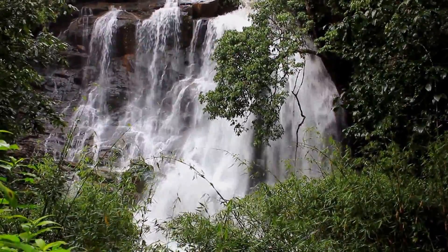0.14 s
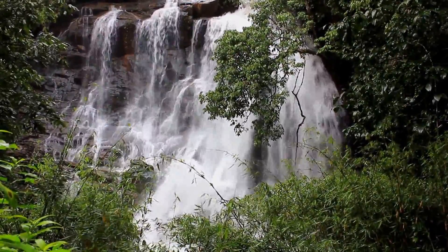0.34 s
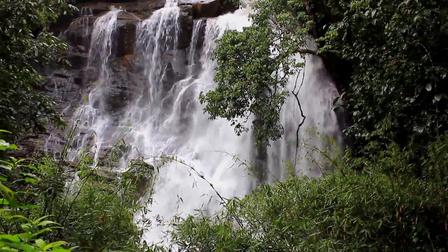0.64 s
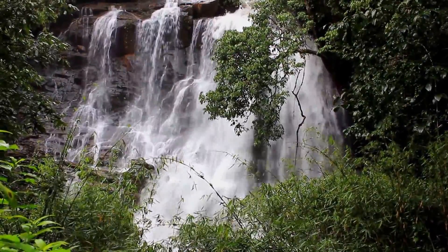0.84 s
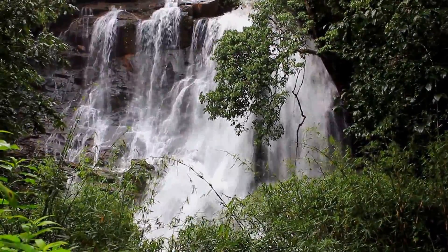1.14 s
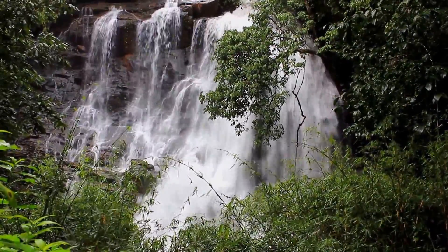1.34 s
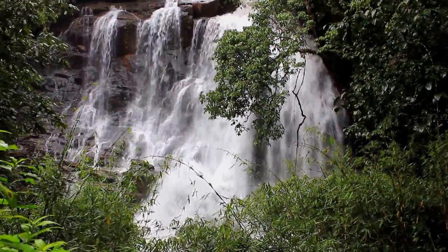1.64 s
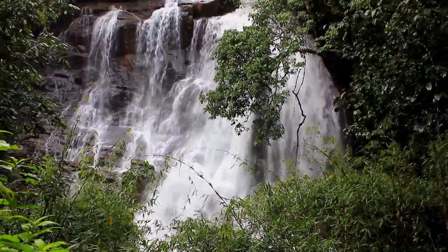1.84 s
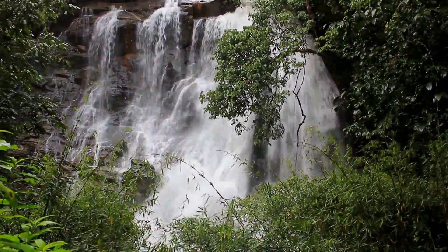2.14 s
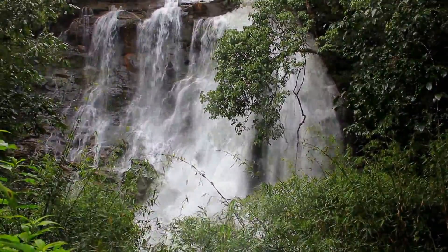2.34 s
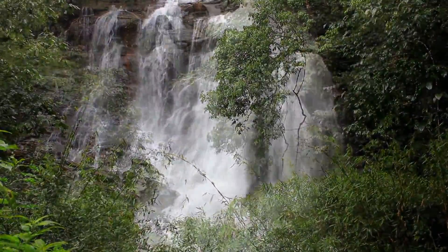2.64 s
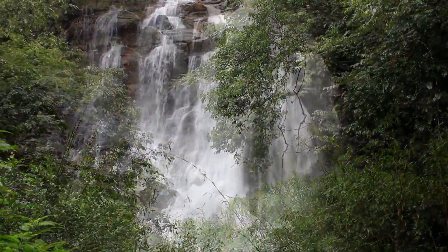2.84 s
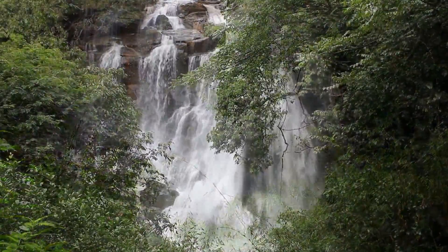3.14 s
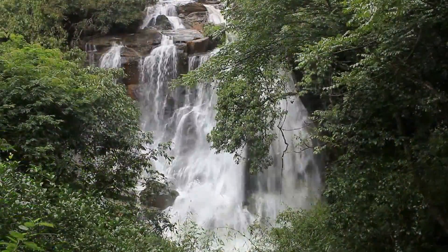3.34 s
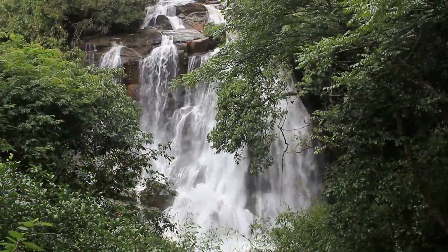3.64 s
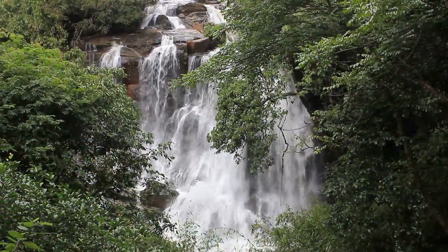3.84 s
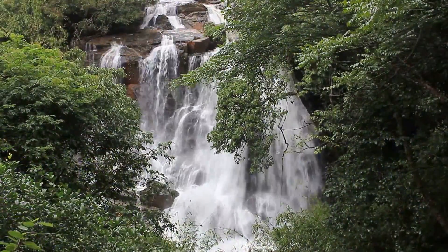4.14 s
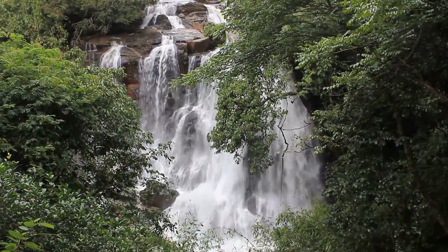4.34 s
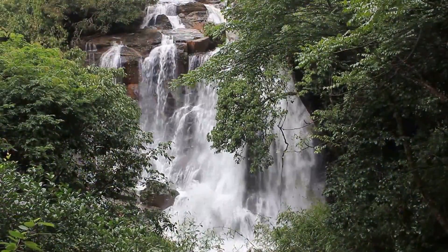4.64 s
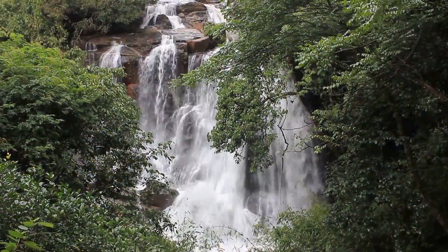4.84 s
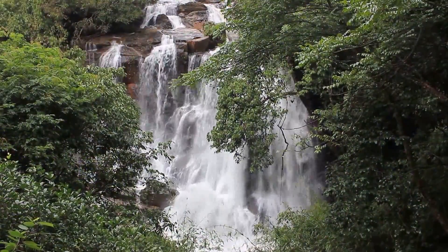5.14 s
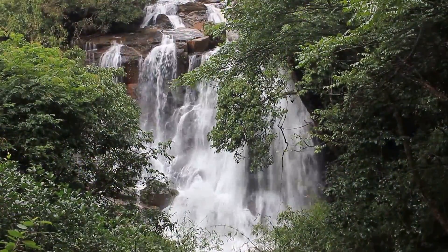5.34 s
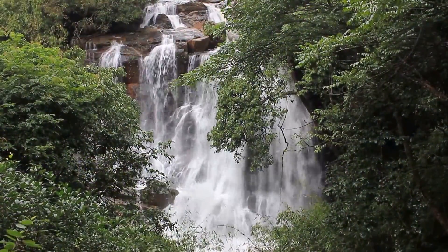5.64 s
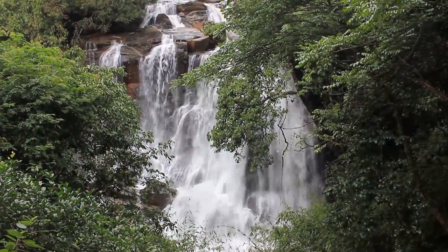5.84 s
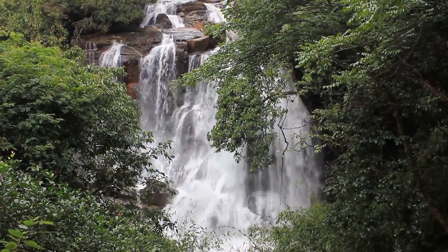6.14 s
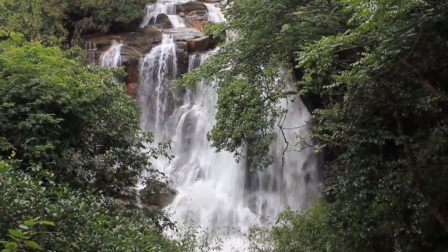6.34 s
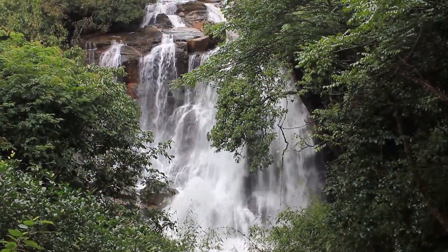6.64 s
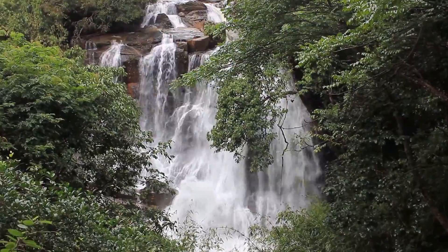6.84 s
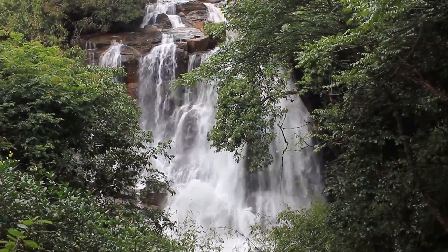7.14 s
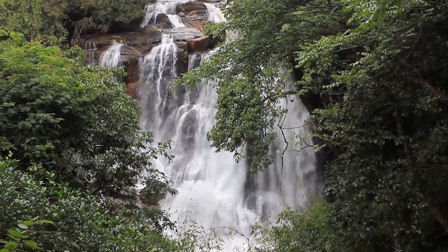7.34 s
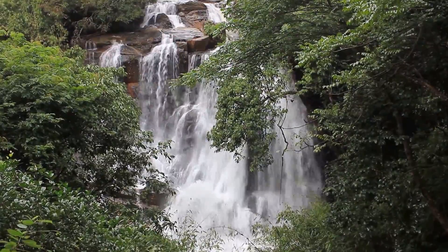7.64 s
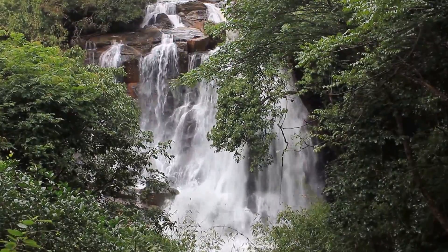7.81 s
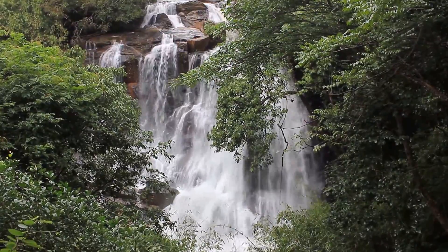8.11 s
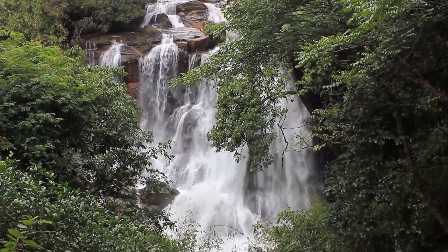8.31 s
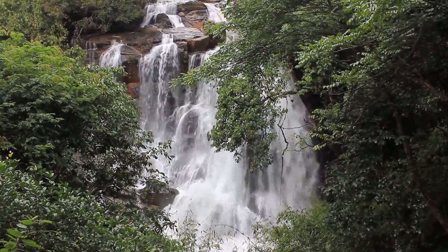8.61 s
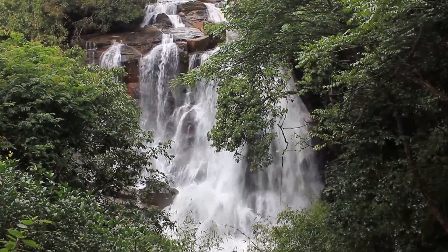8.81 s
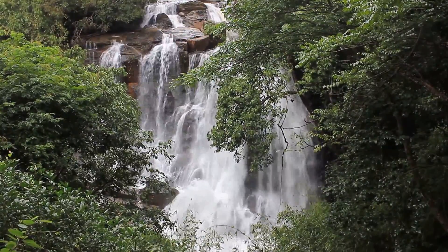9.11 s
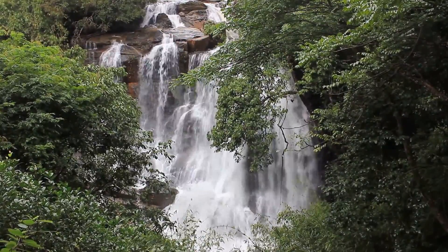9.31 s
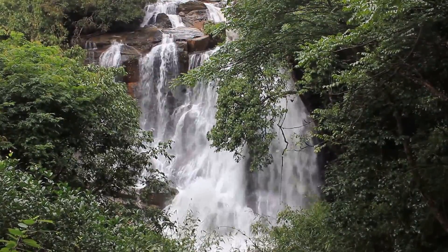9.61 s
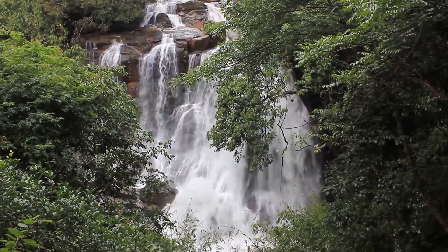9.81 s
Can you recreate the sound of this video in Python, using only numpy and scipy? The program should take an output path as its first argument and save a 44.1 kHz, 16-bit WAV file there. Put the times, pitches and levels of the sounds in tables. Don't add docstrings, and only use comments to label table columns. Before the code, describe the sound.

A broad, steady waterfall roar fills the sound from the start. At about two seconds a second view of the same fall joins abruptly, making it louder and denser; at three and a half the first drops out, leaving a slightly quieter roar. From nearly six seconds, soft low wind puffs bump the bare microphone, thickest around nine. Outdoors in forest, mono.

```python
import sys
import numpy as np
from scipy import signal
from scipy.fft import rfft, irfft, next_fast_len
from scipy.io import wavfile
from scipy.ndimage import uniform_filter1d, map_coordinates

SR = 44100
rng = np.random.default_rng(int(sys.argv[2]) if len(sys.argv) > 2 else 0)


def wrap_up_sound(samples):
    columns = np.atleast_2d(samples).T
    tamed = np.clip(columns, -1, 1)
    steps = np.round(tamed * 32767).astype(np.int16)
    wavfile.write(sys.argv[1], SR, steps)


def nominal_scale(level):
    x = np.asarray(level, float) / 20
    return 10 ** x


N = 439677

# (time [s], flow [dB])
NEAR_FLOW = [
    (0, 0),
    (1, 0),
    (1.9, 0.07),
    (2.15, -0.25),
    (2.7, -.5),
    (2.95, 0.21),
    (3.47, 0.02),
]
# (time [s], flow [dB])
FAR_FLOW = [
    (2, -0.38),
    (3.6, 0.07),
    (4.2, 0),
    (4.75, -.5),
    (5.55, -0.08),
    (6.3, 0.06),
    (7.5, 0.23),
    (8.1, .2),
    (8.7, -0.15),
    (9.97, 0),
]
REGISTER_HZ = [300, 1800, 9000]
FOLLOWS, SURGE_DB, SURGE_RATE = [.6, .5, 1.05], [0.58, 0.176, 0.04], 4
# (frequency [Hz], density [dB per Hz])
ROAR = [(22, -33.5), (45, -20), (90, -12.5), (160, -6), (220, 0.0), (400, -0.75), (500, -5.5), (620, -6.5),
        (800, -2.5), (6000, -4), (9500, -6.5), (11500, -8.5), (13500, -14), (15700, -23.5)]
# (frequency [Hz], level [dB])
NEAR_COLOUR = [(22, -9.5), (120, 0.66), (250, -1.9), (450, 0.5), (700, -1), (1250, 0.25), (1750, -0.91),
               (2050, 1.39), (2600, -0.2), (3200, 1), (5000, -0.5), (7000, -0.5), (10000, 0.23),
               (15700, 0.64)]
# (frequency [Hz], level [dB])
FAR_COLOUR = [(110, -1.1), (250, 0.39), (450, -0.6), (850, 0.6), (1300, -0.042), (1750, -1.2), (2050, 1.6),
              (2600, -0.6), (3050, 0.9), (3500, -0.5), (4300, 0.5), (4800, -0.0), (5400, 0.1),
              (6200, -1.05), (15700, -0.53)]
NEAR_DB, FAR_DB = -15.5, -17.5
NEAR_ENDS, FAR_STARTS = 3.4695, 2.002
# (frequency [Hz], density [dB per Hz])
BUFFET = [(15, -36), (30, -16.5), (60, -3), (110, -1), (180, -3), (300, -18), (600, -61)]
# (time [s], peak level [dB], pitch [Hz])
PUFFS = [(5.764, -25, 131), (5.79, -33, 50), (6.032, -27, 102), (6.127, -32, 115), (6.428, -32.5, 115),
         (6.521, -30, 131), (6.6, -33, 45), (6.605, -29, 169), (6.755, -30, 59), (7.527, -25.5, 134),
         (7.613, -31.5, 131), (7.711, -32.5, 53), (7.798, -31, 86), (8.349, -29, 78), (8.618, -24.5, 121),
         (8.64, -33, 45), (8.704, -24, 83), (8.757, -31, 80), (8.855, -26, 94), (8.896, -22, 121),
         (8.977, -25, 134), (9.053, -23.5, 150), (9.092, -25, 129), (9.226, -27, 115), (9.29, -20.5, 148),
         (9.31, -31, 45), (9.376, -29, 121), (9.59, -30.5, 75), (9.677, -33.5, 139)]
# (peak time [s], flutter level [dB], rise for 10 dB [s], fall for 10 dB [s])
GUSTS = [
    (5.77, -38.5, 0.061, 0.03),
    (6.11, -46, 0.156, 0.34),
    (6.6, -52, .1, .15),
    (7.52, -42, .05, 0.15),
    (8.93, -43, .5, 1),
]
CALM_DB = -65
PUFF_S, PUFF_CYCLES = .006, .4


def unit(x):
    return x / np.sqrt(np.mean(x ** 2) + 1e-20)


def along(points, hz):
    f, v = np.transpose(points)
    return np.interp(np.log(hz + 1), np.log(f + 1), v)


def wobble(rate, t=None):
    t = np.arange(N) / SR if t is None else t
    knots = rng.standard_normal(int(N * rate / SR) + 4)
    return map_coordinates(knots, [t * rate], mode="mirror")


def filtered(x, response):
    m = next_fast_len(N + 8192)
    hz = np.fft.rfftfreq(m, 1 / SR)
    return irfft(rfft(x, m) * response(hz), m)[..., :N]


def impacts(dense, scatter_db):
    hit, size, sign = rng.random((3, N))
    strength = nominal_scale(-scatter_db * np.log(size + 1e-6))
    return unit((hit < dense) * strength * (sign - .5))


def surging(x, flow, patchy_db):
    hz, t, z = signal.stft(x, SR, nperseg=512)
    weights = np.array([along(list(zip(REGISTER_HZ, row)), hz) for row in np.eye(3)])
    own = np.array([db * wobble(SURGE_RATE, t) for db in SURGE_DB])
    shared = np.outer(FOLLOWS, np.interp(t, *np.transpose(flow)))
    surge_db = weights.T @ (shared + own)
    patches = uniform_filter1d(rng.standard_normal(z.shape), size=24, axis=0)
    patches = uniform_filter1d(patches, size=12, axis=1)
    gain = nominal_scale(surge_db + patchy_db * unit(patches))
    return signal.istft(z * gain, SR, nperseg=512)[1][:N]


def waterfall(flow, colour, level_db):
    water = rng.standard_normal(N) + .2 * impacts(dense=.2, scatter_db=2)
    steady = unit(filtered(water, lambda hz: nominal_scale(along(ROAR, hz) + along(colour, hz))))
    unrest_db = 0.063 * wobble(7) + 0.1 * wobble(18)
    return nominal_scale(level_db + unrest_db) * surging(steady, flow, patchy_db=0.2138)


def breeze():
    t = np.arange(N) / SR
    gust = nominal_scale(CALM_DB)
    for peak, db, rise, fall in GUSTS:
        gust = gust + nominal_scale(db - 10 * np.maximum((peak - t) / rise, (t - peak) / fall))
    push = unit(filtered(rng.standard_normal(N), lambda hz: nominal_scale(along(BUFFET, hz))))
    air = gust * nominal_scale(3 * wobble(12)) * push
    for (at, peak_db, hz), phase in zip(PUFFS, rng.random(len(PUFFS))):
        part = slice(round((at - .1) * SR), round((at + .1) * SR))
        lag = t[part] - at
        length = PUFF_S + PUFF_CYCLES / hz
        thump = np.exp(-(lag / length) ** 2) * np.cos(2 * np.pi * (hz * lag + phase))
        stirred = np.exp(-(lag / .04) ** 2) * push[part]
        air[part] += nominal_scale(peak_db - 2.0) * thump + nominal_scale(peak_db - 12.5) * stirred
    return air


def scene():
    t = np.arange(N) / SR
    near = waterfall(NEAR_FLOW, NEAR_COLOUR, NEAR_DB) * np.clip((NEAR_ENDS - t) / .001, 0, 1)
    far = waterfall(FAR_FLOW, FAR_COLOUR, FAR_DB) * np.clip((t - FAR_STARTS) / .005, 0, 1)
    return np.tile(near + far + breeze(), (2, 1))


def low_pass(x):
    return signal.sosfilt(signal.butter(12, 15900, fs=SR, output="sos"), x)


def record(dry):
    held = dry / (1 + np.abs(dry / .98) ** 6) ** (1 / 6)
    return low_pass(held)


dry = scene()
out = record(dry)
wrap_up_sound(out)
```